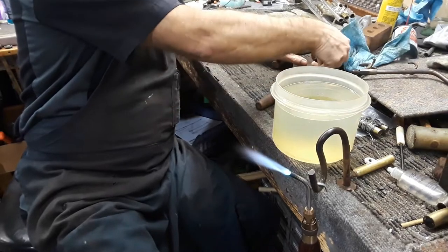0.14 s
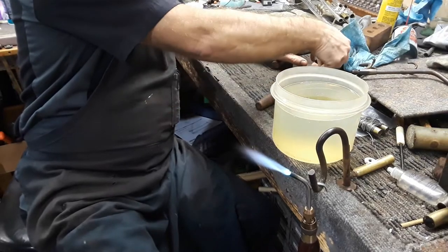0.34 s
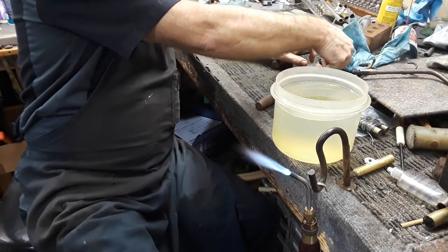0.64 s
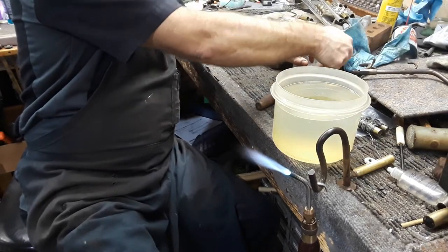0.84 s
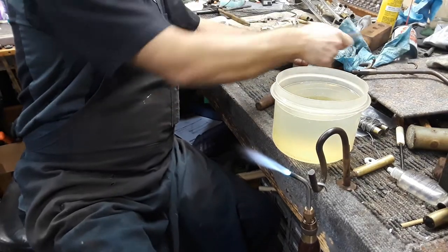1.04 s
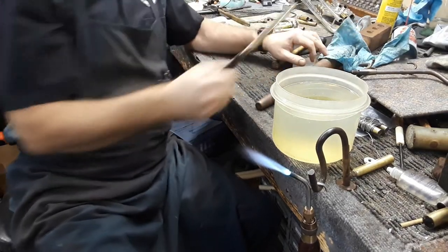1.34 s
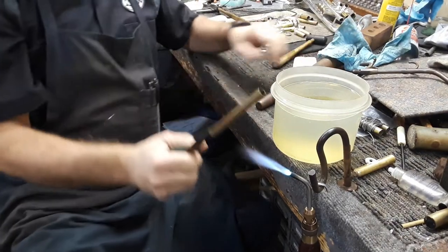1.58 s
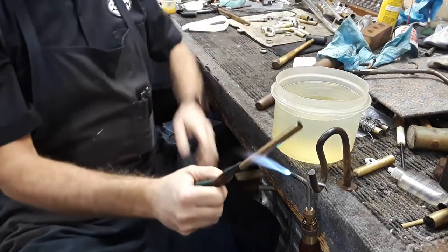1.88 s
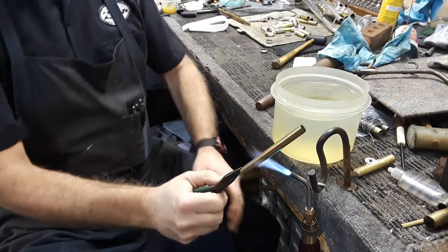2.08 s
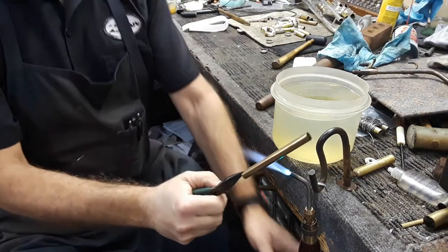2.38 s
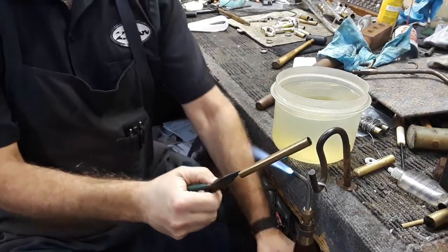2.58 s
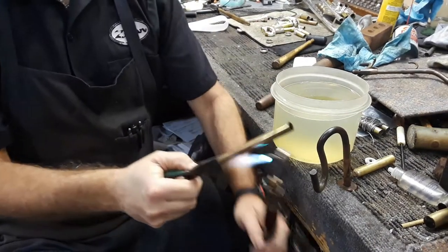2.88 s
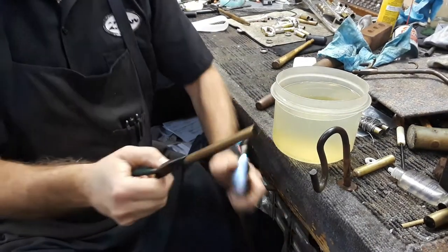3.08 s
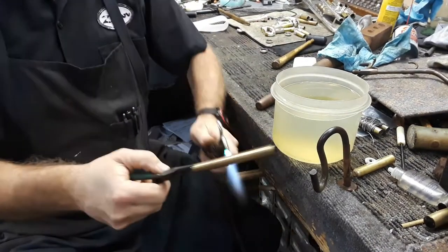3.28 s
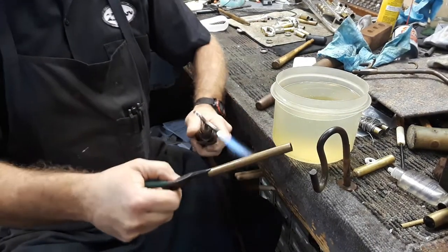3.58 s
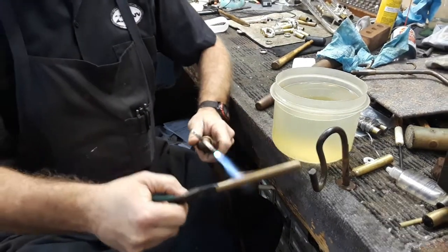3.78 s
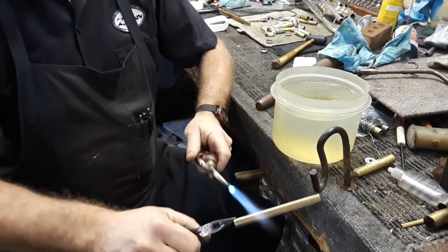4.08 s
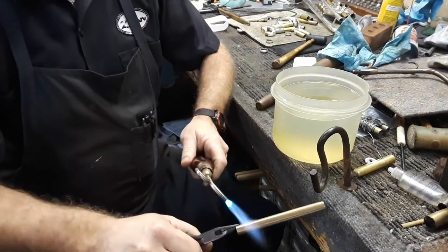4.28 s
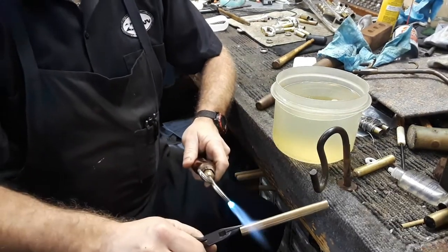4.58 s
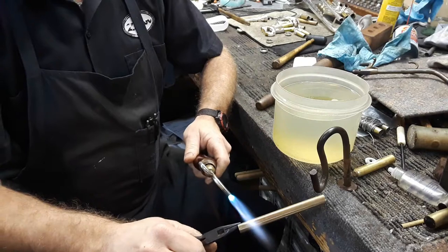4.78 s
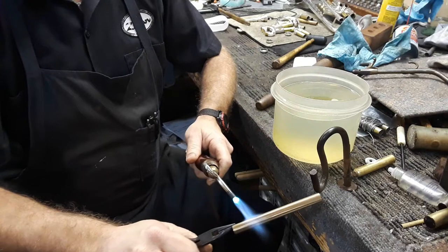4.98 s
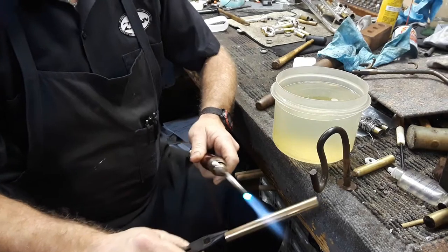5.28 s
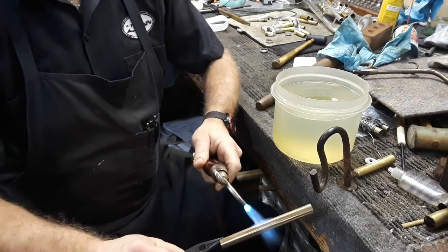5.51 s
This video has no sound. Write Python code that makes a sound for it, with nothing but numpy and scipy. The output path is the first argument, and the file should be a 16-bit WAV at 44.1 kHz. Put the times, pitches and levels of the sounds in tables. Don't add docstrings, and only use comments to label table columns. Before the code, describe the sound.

Steady broadband gas-flame hiss, weakening around three seconds as the torch is turned away, then returning unevenly while a fan hums faintly behind.

```python
import sys
import numpy as np
from scipy import signal
from scipy.io import wavfile
from scipy.ndimage import uniform_filter1d

SR = 44100
rng = np.random.default_rng(int(sys.argv[2]) if len(sys.argv) > 2 else 0)


def voltage_ratio(decibels):
    exponent = np.asarray(decibels, float) / 20
    return 10 ** exponent


def dump(signal):
    limited = np.clip(np.atleast_2d(signal).T, -1, 1)
    pcm = np.round(limited * 32767).astype(np.int16)
    wavfile.write(sys.argv[1], SR, pcm)


N = 248988
FRAME, HOP = 1024, 256
HZ = np.fft.rfftfreq(FRAME, 1 / SR)[:, None]
T = np.arange(N // HOP + 3) * HOP / SR

# frequency_hz, density_db (per Hz)
BENCH_COLOUR = [(650, -9.5), (900, -1.5), (1450, 9), (1950, -6.5), (3050, -10.5), (4400, -2.5),
                (6300, -14.5), (7600, -6.5), (8900, -11), (10200, -7), (11800, -4), (12900, -8.5),
                (14100, -5), (15650, -13.5)]
AWAY_COLOUR = [(650, -36), (900, 5), (1250, 12), (2200, -7), (3700, -9), (4600, 0), (6200, -7),
               (7800, -15.5), (9000, -17.5), (11300, -13.5), (12800, -13.5), (14000, -14), (15650, -17)]
TUBE_COLOUR = [(650, -59), (900, -17), (1300, -7.5), (1800, -9.5), (2800, -2), (4500, 2), (6300, -5),
               (7700, -5), (9200, -19), (11400, -10), (12800, -14.5), (14000, -19), (15650, -17)]
# centre_hz, width_hz, lift_db
BENCH_RIDGES = [(670, 90, 5), (1330, 60, -3), (1430, 100, 2), (1620, 80, 2.5), (2200, 250, 2),
                (3100, 200, -4), (4160, 170, 5), (4480, 140, -4.5), (4750, 120, 5), (7450, 200, 2.5),
                (7750, 150, 2.5)]
HAND_RIDGES = [(1150, 150, 2.5), (1430, 100, 2.5), (1720, 100, -3), (2030, 100, 2.5), (3270, 150, 2.5),
               (3930, 100, 4.5), (4370, 150, 3.5), (4650, 120, -4), (6700, 250, -2.5), (4940, 150, 5),
               (8030, 200, 3)]
AWAY_RIDGES = [(1544, 68, 10), (2650, 200, 1.5), (3060, 240, 7), (4000, 200, 5.5), (5050, 350, 4),
               (8020, 360, 12)]
# centre_hz, width_hz, lift_db
HOUSING = [(745, 40, -6), (14750, 450, -7)]
# frequency_hz, lead_rad
BENCH_PHASE = [(700, 0), (1400, .4), (1800, 0), (3500, -.05), (4500, -.6), (5000, -.15), (7000, -.4),
               (8100, -1.4), (9000, -.05), (10400, -.9), (10900, -.1), (13300, -1.1), (14200, -.4),
               (16000, -.4)]
# frequency_hz, balance_db
BENCH_BALANCE = [(700, 0), (1150, 2.5), (1500, -1.5), (4200, .3), (4700, -4), (5300, -.3), (6600, 2.5),
                 (7200, .3), (7750, 4.5), (8500, -3), (9500, .3), (10700, -3), (12000, .3), (16000, .3)]
# frequency_hz, coherence_0_to_1
BENCH_SAME = [(500, .93), (800, .8), (1400, .85), (2100, .92), (2900, .94), (3250, .75), (3650, .92),
              (6000, .88), (7000, .8), (7600, .93), (8400, .7), (9400, .9), (10300, .78), (12000, .84),
              (15000, .52)]
HAND_SAME = [(500, .93), (800, .75), (1500, .8), (2500, .99), (3200, .82), (3650, .95), (5000, .8),
             (7000, .68), (11000, .75), (15000, .55)]
AWAY_SAME = [(500, .9), (800, 0.8), (2000, 0.59), (3500, 0.67), (5000, 0.28), (8000, 0.28), (15000, 0.14)]
# time_s, level_db, bearing_db (left-right)
TORCH = [(0, -30, 1.5), (1.9, -31, 1.5), (2.55, -32.5, 1.7), (2.66, -32.5, 1), (2.82, -35, -2.5),
         (2.97, -38, -1), (3.26, -37.5, 0.5), (3.45, -38, 0), (3.56, -37.5, 0.5), (3.8, -37, 0.5),
         (3.97, -36.5, 9.5), (4.1, -35, 6), (4.3, -33, 1.5), (4.62, -33.5, 3), (4.78, -34, 1.5),
         (5.15, -32.5, 0.5), (5.38, -34.5, 7.5), (5.6, -32, 1.5)]
# time_s, lifted_0_to_1, reflection_hz, lift_db
GRIP = [(0, 0.11, 4900, 3.5), (1.3, 0, 4750, .8), (2.5, 0.08, 4630, 0), (2.64, 0.57, 4800, 4.5),
        (2.8, 0.5, 5050, 2.5), (3.05, 0.82, 4400, -2), (3.23, 0.92, 4300, 7.5), (3.45, 1, 3700, -5),
        (3.56, 0.99, 4900, 6), (3.93, 0.77, 4300, -3.5), (4.07, .8, 4200, 3.5), (4.3, 0.83, 4900, 1.5),
        (5.65, 0.61, 5040, 1)]
# facing_db, loss_share, in_hand_db (extra), turned_away_db (extra)
BANDS = [
    (-43, .05, 3.5, -1.5),
    (-30.5, 0.89, 0.42, 2),
    (-40, 0.32, -.6, -8),
    (-36.5, 0.41, 3.9, -8),
    (-39.5, 0.44, 2.7, -11),
]
# frequency_hz, density_db (per Hz)
WASH = [(12, -60), (20, -30), (101, -18), (188, -6.5), (237, -3), (284, -14.5), (318, -6.5), (368, -11),
        (441, -5.5), (511, -11.5), (622, -4), (733, -7.5), (782, -3.5), (892, -14), (1000, -5), (1300, -13),
        (2200, -120)]
# frequency_hz, coherence_0_to_1
WASH_SAME = [(25, 0.62), (70, 0.53), (120, 1), (240, 0.87), (450, 0.87), (800, 0.68)]
# pitch_hz, width_hz, level_db (rms), steady_ratio (steady over wavering part)
FAN = [(241.6, 1, -51, 17), (300, 4.4, -61, 1.5), (326, 9.2, -60, 2.4), (212, 7.1, -77, 0.45),
       (189.4, 8.2, -93, .4), (466.2, 104, -55, 0.066)]
# centre_s, length_s, pitch_hz, width_hz, lift_db
SWING = (3.01, 0.41, 980, 250, 5.6)
# centre_s, length_s, top_lift_db
TIPS = [
    (2.97, 0.18, -0.5),
    (3.3, 0.32, 5),
    (3.8, 0.12, 5),
    (4.05, 0.47, 2),
    (4.331, 0.12, 0.5),
    (4.95, 0.17, 2),
    (5.237, 0.077, 3),
    (5.37, 0.11, -3.5),
    (5.6, .2, 1.5),
]


def evened(x):
    return x / np.sqrt(np.mean(x ** 2) + 1e-20)


def read(points, hz=HZ):
    f, value = np.transpose(points)
    return np.interp(np.log(hz + 1), np.log(f + 1), value)


def curves(rows):
    s, *columns = np.transpose(rows)
    return [np.interp(T, s, c) for c in columns]


def ridges(modes, at=HZ):
    return sum(db / (1 + (2 * (at - hz) / width) ** 2) for hz, width, db in modes)


def bell(centre_s, length_s):
    return np.exp(-(2 * (T - centre_s) / length_s) ** 2)


def above(hz):
    return 1 / (1 + (hz / (HZ + 1)) ** 14)


def field(bins, frames):
    z = rng.standard_normal((len(T), len(HZ))).T
    z = uniform_filter1d(z, bins, 0)
    return evened(uniform_filter1d(z, frames, 1))


def port_noise(level_db, same, phase, balance_db, size=FRAME):
    a, b, c, d = rng.standard_normal((len(T), size // 2 + 1, 4)).T
    same = np.clip(same, 0, 1)
    left = a + 1j * b
    unrelated = np.sqrt(1 - same ** 2) * (c + 1j * d)
    right = (same * left + unrelated) * np.exp(-1j * phase)
    z = np.array([left * voltage_ratio(balance_db / 2), right * voltage_ratio(-balance_db / 2)]) * voltage_ratio(level_db)
    scale = np.sqrt(1.5)
    return scale * signal.istft(z, nperseg=size, noverlap=size - HOP)[1][:, :N]


def band_db(colour_db, lo_hz, hi_hz):
    inside = (HZ[:, 0] > lo_hz) & (HZ[:, 0] < hi_hz)
    return 10 * np.log10((voltage_ratio(colour_db[inside]) ** 2).sum(0))


def banded(colour, loss_db, lifted, away):
    edges_hz = [900, 1800, 5300, 7000, 9000, 15500]
    lifts = []
    for (db, share, hand_db, away_db), lo, hi in zip(BANDS, edges_hz, edges_hz[1:]):
        wanted_db = db - share * loss_db + lifted * (hand_db + away ** 2 * away_db)
        lifts.append(wanted_db - band_db(colour, lo, hi))
    level = colour + lifts[0]
    for hz, lower, upper in zip(edges_hz[1:], lifts, lifts[1:]):
        level += (upper - lower) * above(hz)
    return level


def jet():
    jet_db, bearing_db = curves(TORCH)
    lifted, reflection_hz, reflection_db = curves(GRIP)
    lifted = np.clip(lifted, 0, 1)
    loss_db = -30 - jet_db
    away = np.clip(0.35 + 0.68 * (loss_db - 2) / 8, 0, 1)
    pan_db = bearing_db - 1.44

    def blend(bench, tube, off):
        in_hand = (1 - away) * tube + away * off
        return (1 - lifted) * bench + lifted * in_hand

    colour = blend(read(BENCH_COLOUR) + ridges(BENCH_RIDGES),
                   read(TUBE_COLOUR) + ridges(HAND_RIDGES),
                   read(AWAY_COLOUR) + ridges(AWAY_RIDGES))
    colour += ridges(HOUSING) + 1.5 * field(bins=2, frames=60)
    level = banded(colour, loss_db, lifted, away)
    level += ridges([(reflection_hz, 600, reflection_db)])
    level += swing() + tips()

    treble = np.clip(np.log2((HZ + 1) / 1500) / 2.95, 0, 1)
    flutter = evened(uniform_filter1d(rng.standard_normal(len(T)), size=6))
    level += treble * (0.47 * flutter + 0.94 * field(bins=30, frames=12))

    same = blend(read(BENCH_SAME), read(HAND_SAME) + 0.11, read(AWAY_SAME) + 0.071) + 0.028
    late_samples = lifted ** 2 * (1.97 + 2.9 * away ** 2 - 0.75 * pan_db)
    delay_phase = 2 * np.pi * HZ * late_samples / SR
    phase = (1 - lifted) * read(BENCH_PHASE) + delay_phase * (away + (1 - away) * treble)
    phase += 0.4 * field(bins=4, frames=90)
    balance = (1 - lifted) * read(BENCH_BALANCE) + 1.9 * treble * pan_db
    balance += 1.8 * lifted * field(bins=8, frames=50)
    return voltage_ratio(-0.74) * port_noise(level, same, phase, balance)


def room(x, wet_db=-14, t60_s=.35, shared=.95):
    half = SR // 2
    t = np.arange(half) / SR
    common, *own = rng.standard_normal((len(t), 3)).T
    tail = shared * common + np.sqrt(1 - shared ** 2) * np.array(own)
    tail *= voltage_ratio(-60 * t / t60_s) * (t > .002)
    tail *= voltage_ratio(wet_db) / np.linalg.norm(tail, axis=1, keepdims=True)
    tail[:, 0] = 1
    lead = np.concatenate([x[:, half:0:-1], x], axis=1)
    wet = signal.fftconvolve(lead, tail / np.linalg.norm(tail[0]), axes=1)
    return wet[:, half:half + N]


def wash():
    size = 4096
    hz = np.fft.rfftfreq(size, 1 / SR)[:, None]
    colour = read(WASH, hz) + ridges(HOUSING, hz)
    return voltage_ratio(-46.0) * evened(port_noise(colour, read(WASH_SAME, hz), 0, 0, size=size))


def fan():
    t = np.arange(N) / SR
    out = np.zeros(N)
    for hz, width, db, steady in FAN:
        r = np.exp(-np.pi * width / SR)
        noise = rng.standard_normal(2 * N) + 1j * rng.standard_normal(2 * N)
        waver = signal.lfilter([1], [1, -2 * r, r * r], noise)[N:]
        waver = waver / np.sqrt(np.mean(abs(waver) ** 2)) + steady
        out += voltage_ratio(db) * evened((waver * np.exp(2j * np.pi * hz * t)).real)
    return out * voltage_ratio(np.array([[-.3], [.3]]))


def swing():
    s, length, hz, width, db = SWING
    return ridges([(hz, width, db * bell(s, length))])


def tips():
    lift_db = sum(db * bell(s, length) for s, length, db in TIPS)
    return lift_db * above(7350)


def scene():
    return room(jet()) + wash() + fan()


def top_cut(x):
    return signal.sosfilt(signal.butter(12, 15730, fs=SR, output="sos"), x)


def record(dry):
    return top_cut(dry)


dry = scene()
out = record(dry)
dump(out)
```